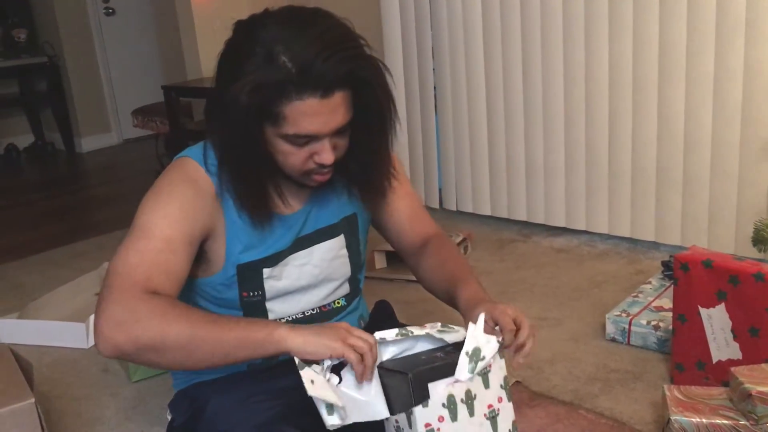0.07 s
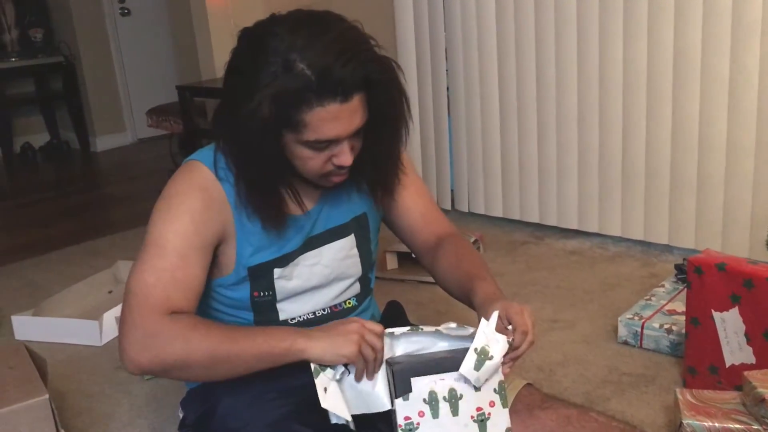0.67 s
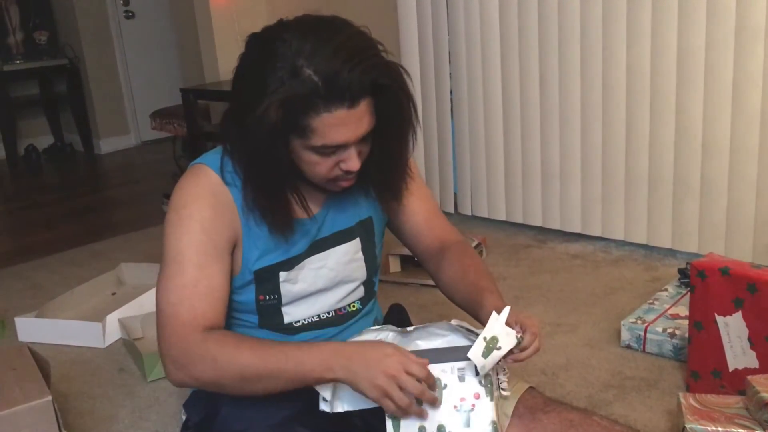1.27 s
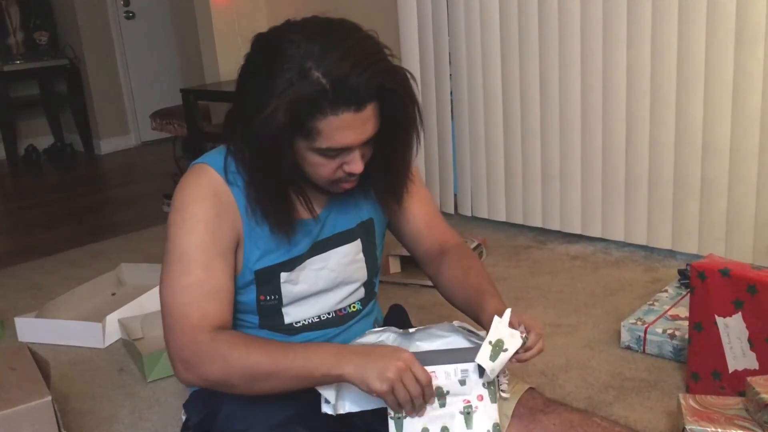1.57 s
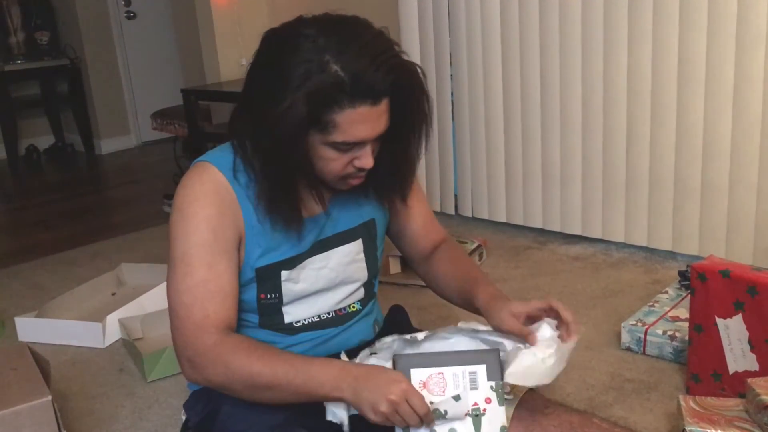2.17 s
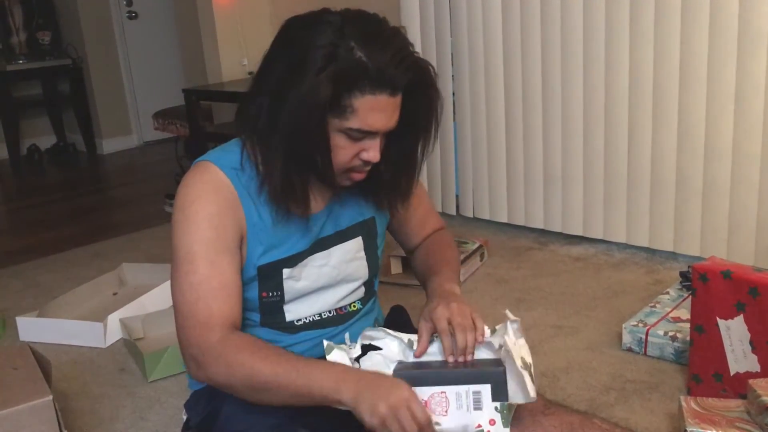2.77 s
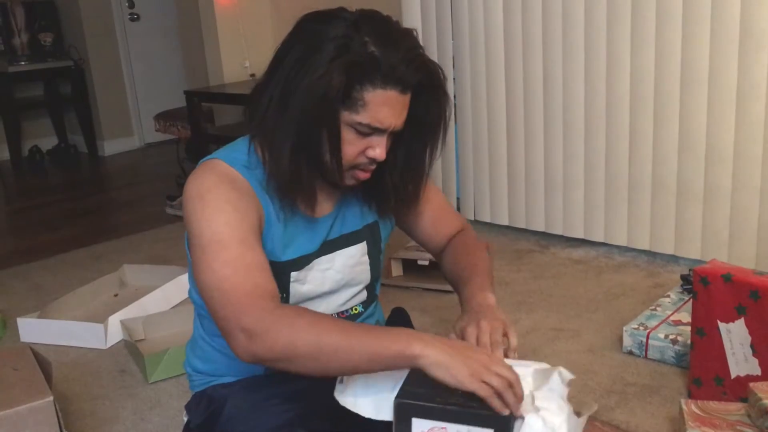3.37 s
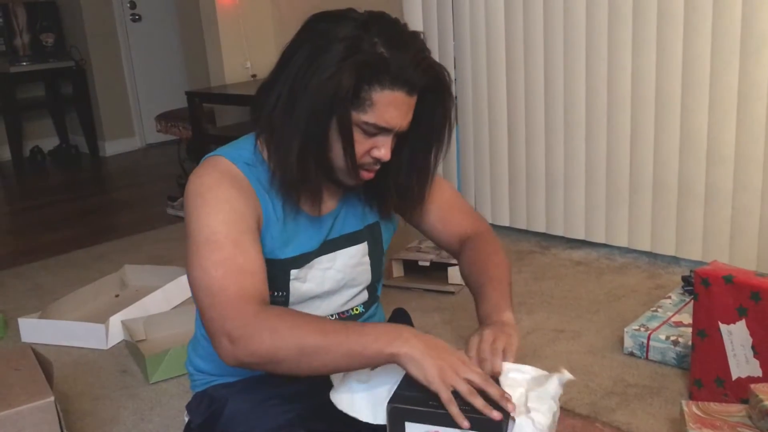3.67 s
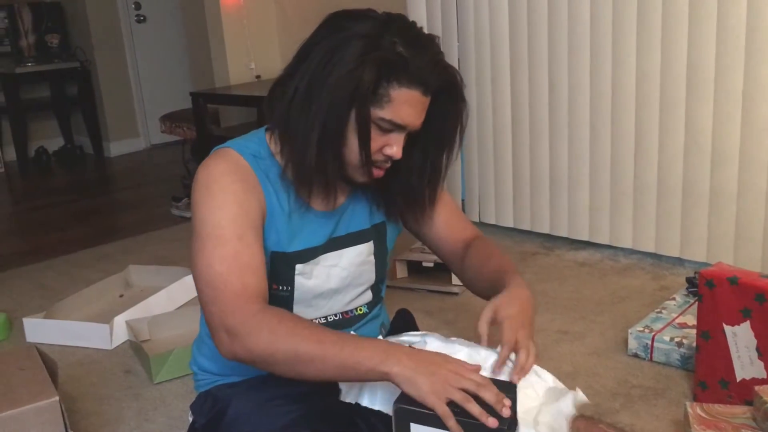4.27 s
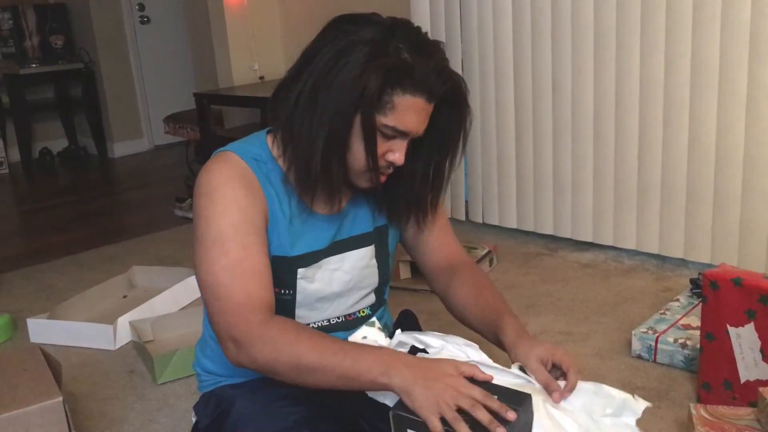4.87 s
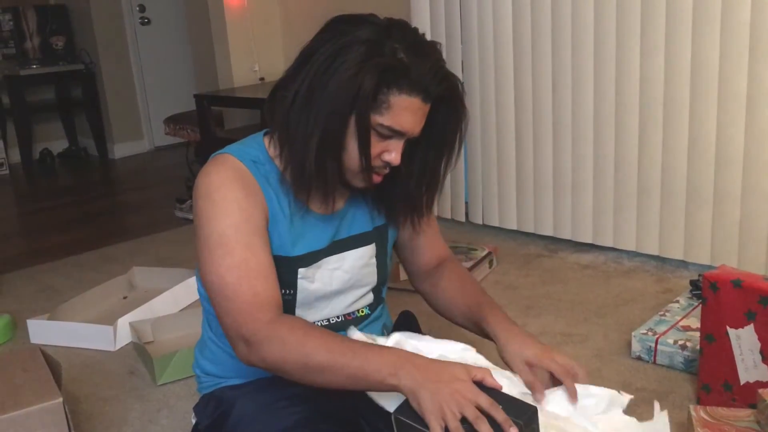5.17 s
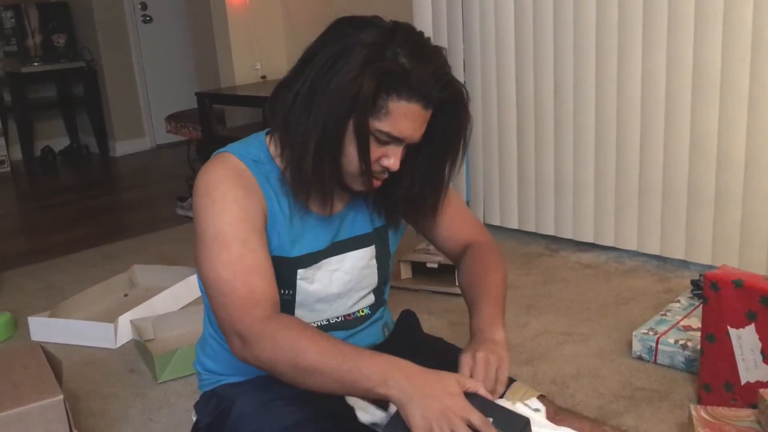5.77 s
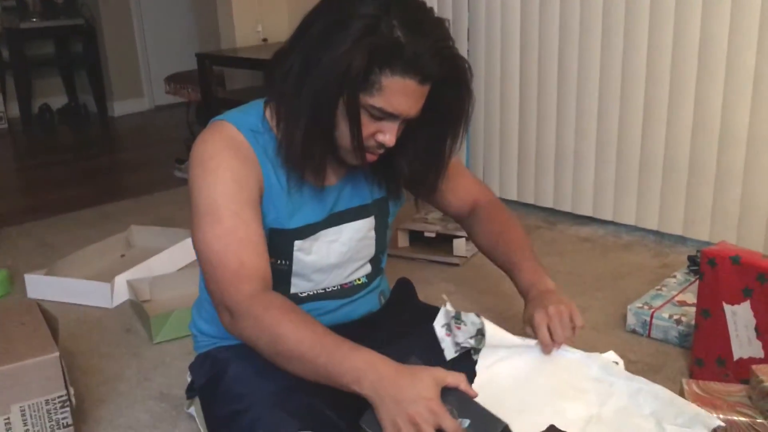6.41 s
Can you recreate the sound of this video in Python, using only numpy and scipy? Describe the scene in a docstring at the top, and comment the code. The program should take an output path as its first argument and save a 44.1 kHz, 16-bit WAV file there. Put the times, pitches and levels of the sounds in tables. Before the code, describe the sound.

Hands pull wrapping paper off a cardboard gift box in a quiet carpeted room, heard by one nearby microphone with a short echo. For the first second the paper crinkles in quick bursts with sharp snaps. After a brief lull, a bright, crackly pull runs from about 1.5 to 2.2 seconds. Lighter rustling and small ticks follow until 3 seconds. From 3.2 to 4.5 seconds come short, duller crumples with soft hollow knocks and scrapes from the box. The loudest stroke arrives at about 4.7 seconds, with a bump, and rustling carries on to 5.2. After a few softer touches, the paper slides in a longer, hissing sweep from about 5.8 seconds to the end at 6.6, the box booming softly under it. Faint still air and a low hum lie beneath, the hum swelling most after 5 seconds.

```python
"""In a quiet carpeted room, hands pull wrapping paper off a gift box, heard by one nearby microphone.
Each stroke of the hands crumples or slides the sheet, and creases give way with sharp snaps.
The box under the paper booms softly when it is dragged on or bumped.
A short room echo follows these sounds, over faint still air and a low hum that swells most near the end."""
import sys
import numpy as np
from scipy import signal
from scipy.fft import rfft, irfft
from scipy.io import wavfile
from scipy.ndimage import uniform_filter1d

SR = 44100
rng = np.random.default_rng(int(sys.argv[2]) if len(sys.argv) > 2 else 0)


def file_out(sig):
    """Save sig as 16-bit WAV at sys.argv[1]."""
    # one column per channel
    cols = np.atleast_2d(sig).T
    # limit, then scale
    lim = np.clip(cols, -1, 1)
    pcm = np.round(lim * 32767).astype(np.int16)
    wavfile.write(sys.argv[1], SR, pcm)


N = 293000
TIME = np.arange(N) / SR


def undb(db):
    """Turn decibels into a factor to multiply by."""
    return 10 ** (np.asarray(db) / 20)


def unit(x):
    """Scale a signal to an average power of 1."""
    return x / np.sqrt(np.mean(x ** 2))


def energy_one(x):
    """Scale each row to a total energy of 1."""
    return x / np.linalg.norm(x, axis=-1, keepdims=True)


def on_log_axis(points, hz):
    """Read between (Hz, value) points, giving every octave the same room."""
    point_hz, value = np.transpose(points)
    return np.interp(np.log(np.maximum(hz, 1)), np.log(point_hz), value)


def colour(x, points, size=4096):
    """Shape the tone by (Hz, dB) points. Nothing rings ahead of a click, so it stays sharp."""
    gain = undb(on_log_axis(points, np.fft.rfftfreq(size, 1 / SR)))
    cepstrum = irfft(np.log(gain))
    # fold the part that would come before a click onto the part after it
    cepstrum[1:size // 2] *= 2
    cepstrum[size // 2 + 1:] = 0
    return signal.oaconvolve(x, irfft(np.exp(rfft(cepstrum))))[:len(x)]


def ring(x, hz, width_hz):
    """One resonance: its own pitch passes at full strength, others are weakened."""
    angle = 2 * np.pi * min(hz, SR / 2 - 1000) / SR
    damping = np.sin(angle) * width_hz / hz / 2
    return signal.lfilter([damping, 0, -damping], [1 + damping, -2 * np.cos(angle), 1 - damping], x)


def walk(rate):
    """A smooth random curve, about 1 in size, that turns `rate` times a second."""
    step = int(SR / rate)
    stairs = np.repeat(rng.standard_normal(N // step + 2), step)
    return unit(uniform_filter1d(stairs, step)[step:step + N])


def place(times, db, sounds):
    """Mix short sounds, one per row, at their times and levels."""
    index = (np.maximum(times, 0) * SR).astype(int)[:, None] + np.arange(sounds.shape[1])
    return np.bincount(index.ravel(), (undb(db)[:, None] * sounds).ravel(), N)[:N]


def buckles(hz, flutter_s, flip_db, spread, broad_db, size, slip_db=2.5, slip_samples=32):
    """One row per facet (flat patch of paper): it flips sharply, then flutters and rings at its pitch."""
    t = np.arange(size) / SR
    noise = rng.standard_normal((len(hz), size + size // slip_samples))
    slips = undb(slip_db * np.repeat(noise[:, size:], slip_samples, axis=1))
    flutter = noise[:, :size] * slips * np.exp(-t / np.reshape(flutter_s, (-1, 1)))
    push = rfft(energy_one(flutter)) + undb(flip_db)  # the flip is a click: equal at all frequencies
    ratio = (np.fft.rfftfreq(size, 1 / SR) + 1) / hz[:, None]
    resonance = 1 / (1 + 1j * (ratio - 1 / ratio) / spread)  # more spread, less clear pitch
    return energy_one(irfft(push * (resonance + undb(broad_db))))


def still_air(level_db=-59):
    """The still air of the room is a faint, deep noise."""
    # The tone of the air. Each row: frequency in Hz, gain in dB.
    air_tone = [(20, -22), (42, -5.5), (70, -1), (120, -9), (170, -8.5), (260, -16), (500, -24.5),
                (2000, -32.5), (8000, -38), (16000, -53)]
    return undb(level_db) * unit(colour(rng.standard_normal(N), air_tone))


def hum(waver_db=2.7, drift_hz=1.42, fade_s=0.23):
    """Two low wavering tones that swell now and then, perhaps a motor beyond the walls."""
    # The tones of the hum. Each row: pitch in Hz, level between swells in dB.
    tones = [(57, -59), (94, -75.5)]
    # Its swells. Each row: start and end in seconds, rise of the lower and of the upper tone in dB.
    swells = [(0.6, 1.4, 4.5, 13.5), (4.55, 4.902, 1, 17.5), (5.14, 5.71, 11, 26.5), (5.828, 6.128, 12, 24),
              (6.187, 6.552, 5, 25.5)]
    start, end, *rises_db = np.transpose(swells)[:, :, None]
    swell = np.clip(np.minimum(TIME - start, end - TIME) / fade_s + .5, 0, 1)
    out = 0
    for (hz, db), rise_db in zip(tones, rises_db):
        phase = 2 * np.pi * np.cumsum(hz + drift_hz * walk(13)) / SR
        gain = undb(db) * (1 + (swell * (undb(rise_db) - 1)).sum(axis=0))
        out = out + unit(np.sin(phase) * undb(waver_db * walk(13))) * gain
    return out


def room(x, echo_s=.0078, echo_db=-14, echo_blur_s=0.0026, tail_db=-10.5, gap_s=0.01, size=32768):
    """Add a blurred first echo off a near surface, then the smooth tail of a furnished room."""
    # How the room dies away. Each row: frequency in Hz, seconds to fade by 60 dB.
    decays = [(250, 0.62), (1000, 0.77), (3000, 0.42), (7000, 0.44), (14000, 0.42)]
    centres_hz, fades_s = np.transpose(decays)
    t = np.arange(size) / SR
    hz = np.fft.rfftfreq(size, 1 / SR)
    noise = rfft(rng.standard_normal(size))
    tail = 0
    for share, fade_s in zip(np.eye(len(decays)), fades_s):
        band = irfft(noise * on_log_axis(np.c_[centres_hz, share], hz))
        tail = tail + band * np.exp(-np.log(1000) * t / fade_s)
    tail = tail * (t > gap_s)
    echo = rng.standard_normal(size) * (t > echo_s) * np.exp(-np.abs(t - echo_s) / echo_blur_s)
    response = undb(tail_db) * energy_one(tail) + undb(echo_db) * energy_one(echo)
    return x + signal.fftconvolve(x, response)[:N]


def box_ring(force):
    """The cardboard box answers a push with its low, hollow notes."""
    # Resonances of the box and the air in it. Each row: pitch in Hz, width in Hz, gain in dB.
    box_notes = [(141.7, 45, -10), (217, 16.6, -4.5), (255.3, 16.5, 1), (282.5, 12.8, -2),
                 (328.5, 31, -2.5), (387, 45, -6.5), (430, 17, -9.5), (557, 11.4, -11), (680, 110, -21)]
    notes = sum((-1) ** k * undb(db) * ring(force, hz, width) for k, (hz, width, db) in enumerate(box_notes))
    return ring(notes, hz=287, width_hz=860)


def box_drag(drag, gain_db=0.5, jerk_db=3, even_s=0.11):
    """Jerky friction sets the box booming, as strongly as the hand drags."""
    boom = box_ring(rng.standard_normal(N) * undb(jerk_db * walk(60)))
    even_boom = boom / np.sqrt(uniform_filter1d(boom ** 2, int(even_s * SR)))
    return even_boom * drag * undb(gain_db)


def box_bumps(contact_hz=600, contact_s=0.0082, contact_db=-4, ring_db=4):
    """A soft touch gives a dull pat and a hollow knock from the box."""
    # Fingers and paper bumping the box. Each row: time in seconds, strength in dB.
    bumps = [(0.195, -42), (0.425, -55), (0.53, -43.5), (0.772, -36.5), (1.632, -38.5), (1.862, -47),
             (1.972, -45), (2.545, -41.5), (2.961, -45), (3.333, -34), (3.393, -47), (3.46, -40),
             (3.638, -43), (3.732, -40), (4.1416, -35.5), (4.77, -30), (4.797, -38), (4.84, -47),
             (5.088, -35), (5.466, -56), (5.6365, -36), (5.992, -35.5)]
    times, db = np.transpose(bumps)
    pats = buckles(np.full(len(times), contact_hz), contact_s, flip_db=-5, spread=1.4, broad_db=-56, size=1024)
    force = np.sqrt(.01 * SR) * place(times, db, pats)  # strength counts as an average over 10 ms
    return undb(contact_db) * force + undb(ring_db) * box_ring(force)


def hand_strokes(attack_s=0.0073, release_s=0.027):
    """Each stroke takes hold, swells or fades, then settles. Gives four curves that steer the sound."""
    # Pulls and pushes on the sheet. Each row: start and end in seconds, level in dB, swell from start
    # to end in dB, dullness in dB (high for slack paper, low for taut), share of sliding against
    # crinkling from 0 to 1, drag on the box in dB.
    strokes = [(0.0, 0.052, -42, -4, -3.5, 0.34, -63), (0.088, 0.14, -38.5, -7, -2, 0.17, -59.5),
               (0.196, 0.212, -35, -7, -5.5, 0.16, -54.5), (0.338, 0.472, -34, 2, -5, 0.095, -51.5),
               (0.539, 0.543, -42.5, -14, -13, 0.22, -61), (0.697, 0.808, -37, 0.5, -5.5, 0.11, -57),
               (0.888, 0.926, -40, 4.5, 2.5, 0.13, -61), (0.945, 1.009, -34.5, 5, -7, 0.15, -50),
               (1.028, 1.147, -59, -10, 16.5, .15, -58.5), (1.39, 1.43, -64, 2, -5, 0.092, -75),
               (1.445, 1.602, -47.5, 7, -0.5, .1, -63.5), (1.61, 1.78, -32.5, -3, -13, .05, -52),
               (1.79, 2.034, -38, -3.5, -9.5, 0.34, -53.5), (2.031, 2.168, -32.5, 0.5, -5.5, 0.29, -55),
               (2.215, 2.322, -55, -6, -2, .45, -60.5), (2.441, 2.73, -50, -1, -3.5, 0.43, -62),
               (2.826, 3.04, -56, 0, -3.5, 0.62, -61.5), (3.086, 3.147, -59.5, 4, -5, 0.54, -70),
               (3.19, 3.265, -36.5, -6.5, -1.5, 0.35, -51), (3.308, 3.342, -33.5, 4.5, 2.5, 0.35, -42),
               (3.366, 3.607, -45.5, -11.5, 1.5, 0.24, -56), (3.627, 3.641, -37.5, -1, 3.5, 0.51, -44.5),
               (3.692, 3.964, -44, 4, 2.5, .4, -54), (4.03, 4.116, -45, -7, 2, 0.32, -66),
               (4.144, 4.236, -39, -6.5, 1.5, 0.45, -51.5), (4.27, 4.446, -44.5, -1.5, -0.5, 0.43, -57.5),
               (4.533, 4.673, -40, 11.5, 1.5, 0.52, -53.5), (4.688, 4.805, -25.5, 3.5, -4, 0.57, -41),
               (4.84, 4.957, -37, -2, -6, 0.27, -49), (4.983, 5.181, -32, -2, -7.5, 0.69, -44.5),
               (5.22, 5.299, -51, 5, -8, 0.66, -67), (5.378, 5.386, -47, -3, 1.5, .65, -57),
               (5.438, 5.48, -44, 1, 8.5, .6, -54), (5.518, 5.61, -43.5, 1.5, -1, .5, -50.5),
               (5.631, 5.783, -37, -4.5, -0.5, 0.48, -48), (5.795, 5.869, -40.5, 16, -2, 0.7, -49.5),
               (5.896, 6.04, -31, -2.5, -5, 0.79, -41), (6.04, 6.123, -35, 1.5, -8, 0.87, -44.5),
               (6.123, 6.256, -31.5, -2, -8, 0.96, -51), (6.268, 6.566, -35, -0.5, -10, 0.93, -53),
               (6.574, 6.635, -31, 6.5, -11.5, 0.76, -49.5)]
    start, end, db, swell_db, dull_db, slide, drag_db = np.transpose(strokes)[:, :, None]
    t = TIME[::32]
    gate = np.exp(-np.maximum(start - t, 0) / attack_s - np.maximum(t - end, 0) / release_s)
    progress = np.clip((t - start) / (end - start), 0, 1)
    effort = gate * undb(swell_db * (progress - .5))
    power = (effort * undb(db)) ** 2 + 1e-30
    loudness = np.sqrt(power.sum(axis=0))
    drag = np.linalg.norm(effort * undb(drag_db), axis=0)
    share = power / power.sum(axis=0)  # the strongest stroke has the most say in dullness and sliding
    mixed_dull_db = (share * dull_db).sum(axis=0)
    mixed_slide = (share * np.clip(slide, 0, 1)).sum(axis=0)
    return [np.interp(TIME, t, curve) for curve in (loudness, drag, mixed_dull_db, mixed_slide)]


def sheet_ring(x):
    """The whole sheet rings along with whatever moves on it."""
    # Resonances of the sheet and the gap under it. Each row: pitch in Hz, width in Hz, gain in dB.
    sheet_notes = [(918, 34, -4.5), (1184, 43, -11), (1442, 56, -4.5), (1548, 34, -2.5), (1930, 26, -11),
                   (3170, 66, -3), (5960, 1800, -4)]
    return x + sum(undb(db) * ring(x, hz, width) for hz, width, db in sheet_notes)


def sliding(grain_db=2, catch_db=1):
    """Paper fibres scrape over each other; the grip catches and lets go within the limits of friction."""
    # The tone of paper sliding on paper. Each row: frequency in Hz, gain in dB.
    scrape_tone = [(150, -18.5), (400, -6), (720, -10), (1000, -3), (1900, -1), (2700, -5.5), (4500, -2.5),
                   (7000, -3.5), (9000, -3.5), (12000, -7), (15500, -11.5)]
    grip = undb(grain_db * np.tanh(walk(900)) + catch_db * np.tanh(walk(70)))
    return unit(sheet_ring(colour(grip * rng.standard_normal(N), scrape_tone)))


def crinkles(facet_hz, count=2300, scatter_db=3.5, scatter_octaves=0.5, wander_octaves=0.4, even_s=0.023):
    """A shower of tiny buckles of all sizes; the pitch jumps about as one facet after another gives way."""
    # The tone of the crinkles. Each row: frequency in Hz, gain in dB.
    paper_tone = [(150, -11), (400, -21), (700, 2), (1100, -1), (1600, -6), (2200, 2), (3500, -0.5),
                  (6500, 2), (9000, 3.5), (12000, 1.5), (15500, -0.5)]
    times = rng.uniform(0, N / SR, count)
    size_db = scatter_db * np.minimum(rng.exponential(size=count), 2.5)
    wandering_hz = facet_hz * 2 ** (wander_octaves * walk(70))
    hz = np.interp(times, TIME, wandering_hz) * 2 ** (scatter_octaves * rng.standard_normal(count))
    grains = buckles(hz, flutter_s=0.0021, flip_db=-4.5, spread=0.16, broad_db=-16.0, size=256)
    shower = sheet_ring(colour(place(times, size_db, grains), paper_tone))
    # the hand feeds in energy steadily, so a big buckle leaves less for its neighbours
    return shower / np.sqrt(np.abs(uniform_filter1d(shower ** 2, int(even_s * SR))) + 1e-12)


def rustle(loudness, dull_db, slide, crumple_hz=3060, slide_hz=6040, split_hz=2700, neutral_db=-6.5):
    """The sheet crinkles and slides; slack paper sounds dull, taut paper is bright and rings."""
    # crumpling bends large, low-pitched facets; sliding bends only small, high ones
    facet_hz = crumple_hz * (slide_hz / crumple_hz) ** slide
    sheet = np.sqrt(1 - slide + 1e-9) * crinkles(facet_hz) + np.sqrt(slide) * sliding()
    low = signal.sosfiltfilt(signal.butter(2, split_hz, fs=SR, output="sos"), sheet)
    treble = sheet - low + undb(-5) * ring(sheet, hz=3450, width_hz=220)
    dullness = undb(0.49 * (dull_db - neutral_db))
    return loudness * (low * dullness + treble / dullness)


def snaps(dull_db, crack_db=1, shake_db=-15, shake_hz=950, shake_s=0.0084, knock_db=5):
    """Single creases give way and shake the sheet and the box; the slacker the paper, the more they shake."""
    # Creases that buckle. Each row: time in seconds, strength in dB, pitch in Hz, flutter in seconds.
    creases = [(0.034, -42, 2680, .0028), (0.09, -30, 4960, 0.0056), (0.127, -34, 5700, 0.0028),
               (0.1896, -43, 3370, 0.0034), (0.344, -31.5, 5300, 0.0051), (0.362, -27, 6540, 0.013),
               (0.408, -26.5, 5100, .0069), (0.4225, -31.5, 5200, .002), (0.451, -34, 5530, .0038),
               (0.4625, -33.5, 5300, 0.0018), (0.482, -40, 3600, 0.00076), (0.604, -37.5, 5170, 0.004),
               (0.707, -36.5, 6200, 0.0098), (0.741, -36, 4140, 0.003), (0.7687, -31.5, 7450, .005),
               (0.8894, -36, 5130, 0.0015), (0.941, -35.5, 3530, 0.011), (0.964, -32.5, 3800, 0.0063),
               (0.991, -30.5, 3760, .004), (0.998, -33, 3700, 0.0033), (1.018, -34.5, 3700, 0.006),
               (1.135, -49, 5200, .0046), (1.443, -51.5, 2900, 0.0025), (1.489, -44.5, 6300, 0.0012),
               (1.5544, -31.5, 4550, .0011), (1.6014, -35, 5500, 0.0036), (1.6184, -27, 3200, 0.011),
               (1.649, -34.5, 3160, 0.0021), (1.671, -37, 3400, 0.0018), (1.682, -28, 4140, 0.0023),
               (1.735, -30.5, 4080, 0.0038), (1.752, -31, 6000, 0.0014), (1.7607, -28.5, 3750, 0.013),
               (1.821, -33.5, 2510, 0.0031), (1.842, -34, 4530, 0.0053), (1.872, -32.5, 5270, 0.0042),
               (1.9284, -38, 3400, 0.00037), (1.948, -40, 7600, 0.0012), (2.039, -32.5, 6140, .0007),
               (2.048, -29, 6600, 0.0046), (2.106, -29.5, 6900, 0.023), (2.302, -39.5, 4440, 0.0029),
               (2.3611, -44, 5960, 0.0012), (2.4126, -46, 3670, .0033), (2.4429, -37, 3170, 0.0027),
               (2.461, -39.5, 8060, 0.001), (2.531, -39, 6200, 0.0034), (2.5516, -38.5, 5500, 0.0028),
               (2.5945, -38, 4240, 0.012), (2.633, -38, 6670, 0.0037), (2.652, -40, 3380, 0.004),
               (2.699, -44, 5870, 0.0014), (2.71, -41.5, 5570, 0.003), (2.8467, -43.5, 6300, .002),
               (2.9634, -40.5, 5640, 0.00077), (3.1917, -31, 6930, 0.00038), (3.255, -35, 5100, 0.0012),
               (3.308, -38, 3300, .0086), (3.33, -35.5, 6000, 0.0042), (3.4155, -43, 4100, 0.0012),
               (3.635, -37.5, 1760, .0044), (3.729, -43.5, 5070, .0009), (3.759, -39.5, 3550, 0.0031),
               (3.801, -41, 7800, 0.0021), (3.894, -39, 6100, 0.0074), (4.0133, -31.5, 1620, 0.0029),
               (4.069, -44.5, 2200, 0.0015), (4.139, -34.5, 1890, 0.0032), (4.209, -34.5, 4650, .0011),
               (4.2782, -33, 4940, 0.00083), (4.3847, -38.5, 2830, 0.0019), (4.541, -38, 3400, 0.0037),
               (4.5821, -31, 9600, .0013), (4.635, -29.5, 6300, 0.0012), (4.657, -35.5, 5300, .0018),
               (4.789, -25.5, 3660, 0.0045), (4.939, -32, 5400, 0.005), (4.99, -33, 5500, .006),
               (5.02, -31, 4960, 0.0028), (5.046, -33.5, 5430, 0.0015), (5.073, -37, 6500, .0015),
               (5.11, -31, 6040, 0.0077), (5.3, -49.5, 7000, 0.002), (5.4653, -40, 1920, 0.0034),
               (5.635, -38.5, 2360, 0.006), (5.71, -33, 5470, 0.0025), (5.842, -34, 3500, 0.012),
               (6.013, -34.5, 2570, 0.007)]
    # The tone of a buckling crease. Each row: frequency in Hz, gain in dB.
    crease_tone = [(300, -37), (900, -6.5), (1900, 4.5), (3500, 4), (6500, 2), (9000, 2), (12000, 0),
                   (16000, -5)]
    times, db, hz, flutter_s = np.transpose(creases)
    cracks = buckles(hz, flutter_s, flip_db=-13.5, spread=0.47, broad_db=-8.5, size=1024)
    shakes = buckles(np.full(len(hz), shake_hz), shake_s, flip_db=-18.5, spread=0.52, broad_db=-67, size=1024)
    cracking = colour(place(times, db + crack_db, cracks), crease_tone)
    shaking = place(times, db + shake_db + np.interp(times, TIME, dull_db), shakes)
    knocking = undb(knock_db) * box_ring(shaking)
    return np.sqrt(.01 * SR) * (cracking + shaking + knocking)  # strength counts as an average over 10 ms


def scene():
    """The hands work the sheet and the box in the room, over hum and still air."""
    loudness, drag, dull_db, slide = hand_strokes()
    air = still_air()
    unwrapping = snaps(dull_db) + rustle(loudness, dull_db, slide) + box_drag(drag) + box_bumps()
    mono = room(unwrapping) + hum() + air
    return np.array([mono, mono])


def record(dry, top_hz=15900):
    """One microphone colours the treble and feeds both channels; the recorder cuts the highest sounds."""
    # The tone of the microphone. Each row: frequency in Hz, gain in dB.
    mic_tone = [(100, 1), (2400, 0), (2850, -3.5), (3200, -0.5), (4100, -2), (4850, -4), (5700, -2),
                (9200, -0.5), (10300, -5.5), (11200, -4.5), (16000, -6.5)]
    mono = colour(dry.mean(axis=0), mic_tone)
    mono = signal.sosfilt(signal.ellip(10, .2, 70, top_hz, fs=SR, output="sos"), mono)
    return np.array([mono, mono])


dry = scene()
out = record(dry)
file_out(out)
```